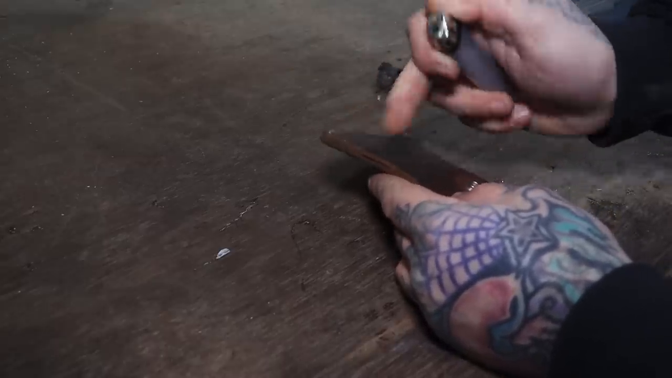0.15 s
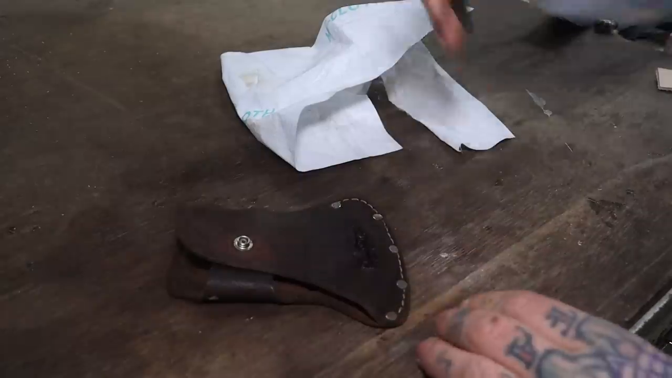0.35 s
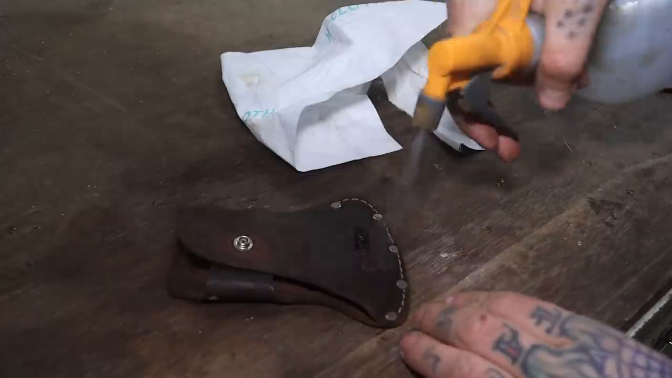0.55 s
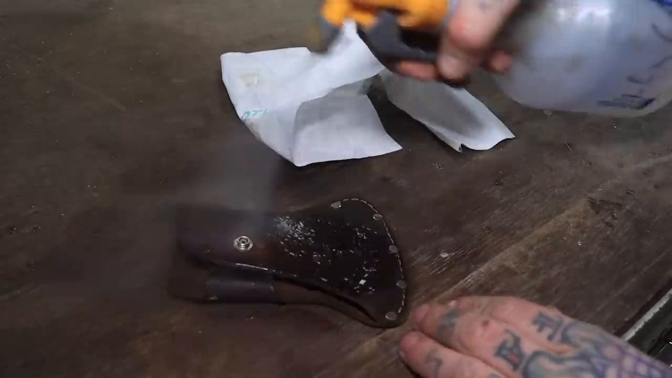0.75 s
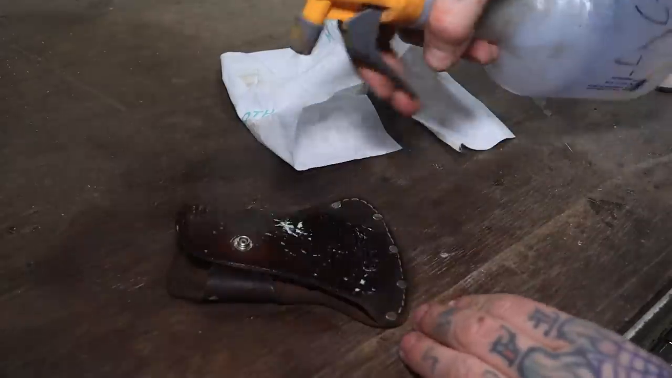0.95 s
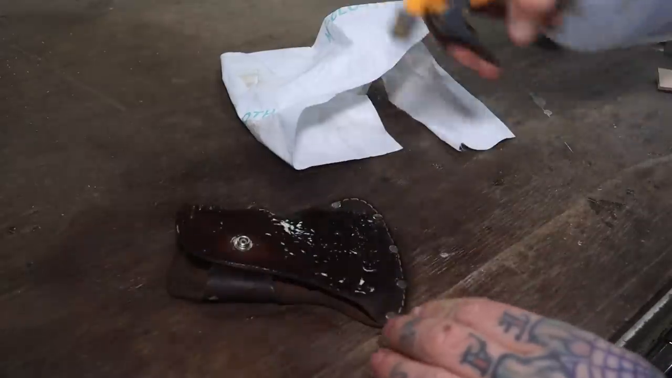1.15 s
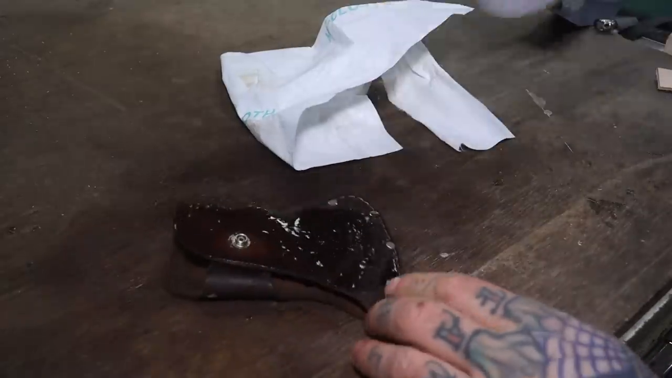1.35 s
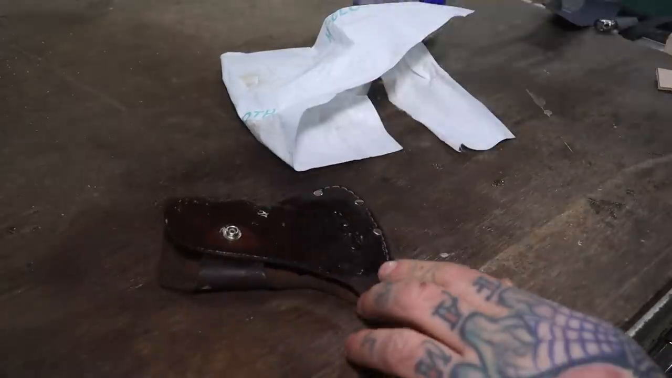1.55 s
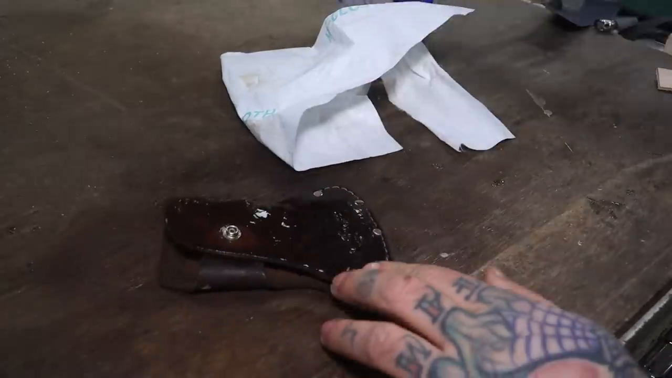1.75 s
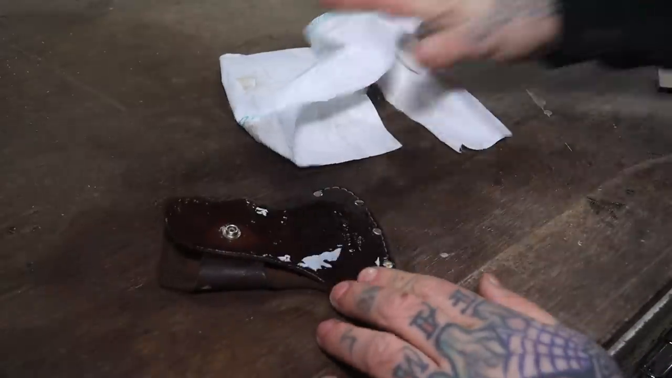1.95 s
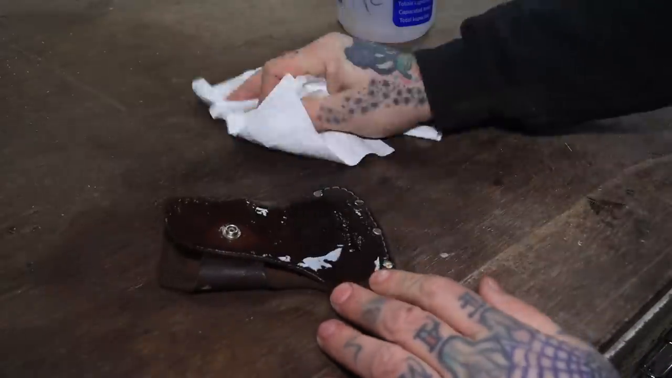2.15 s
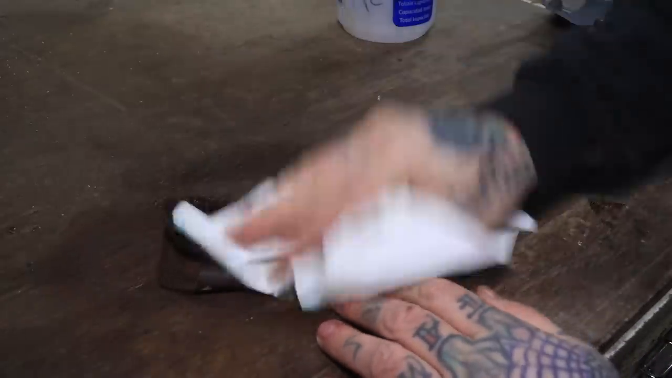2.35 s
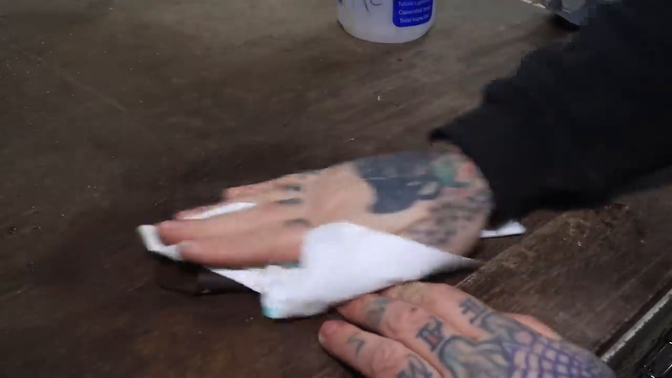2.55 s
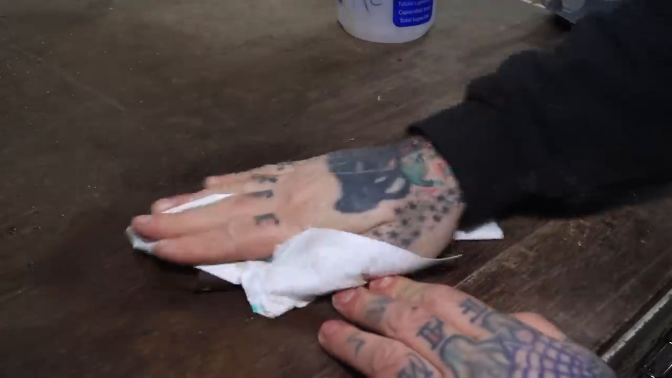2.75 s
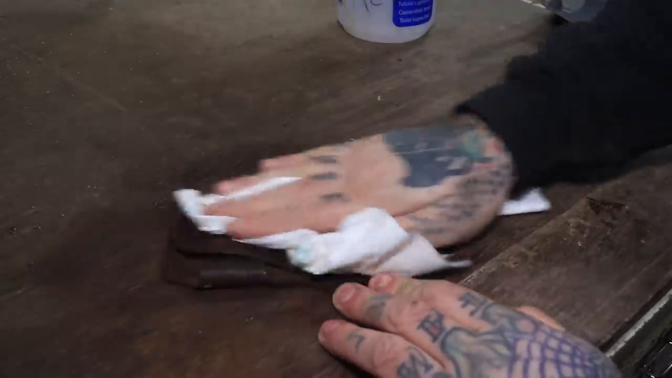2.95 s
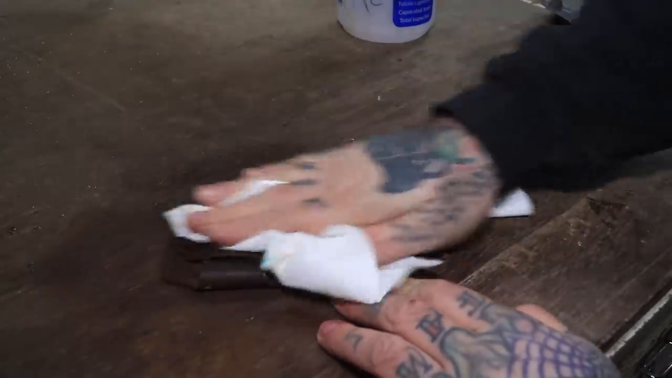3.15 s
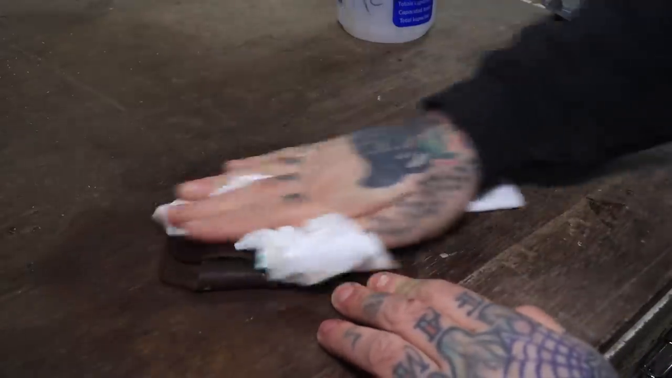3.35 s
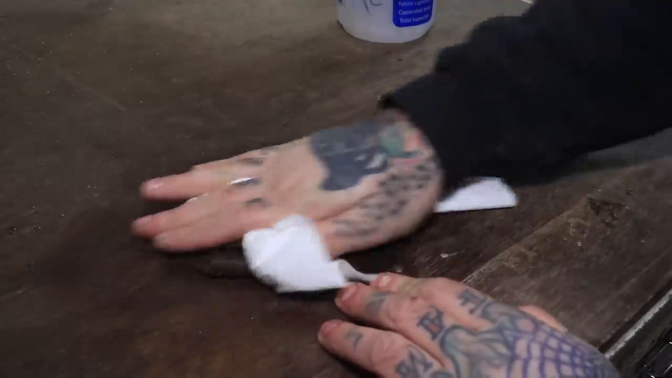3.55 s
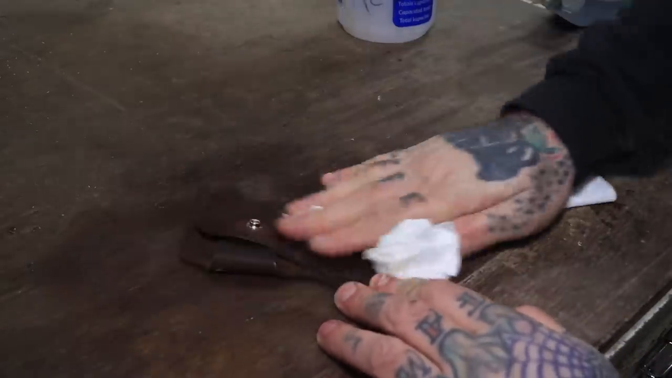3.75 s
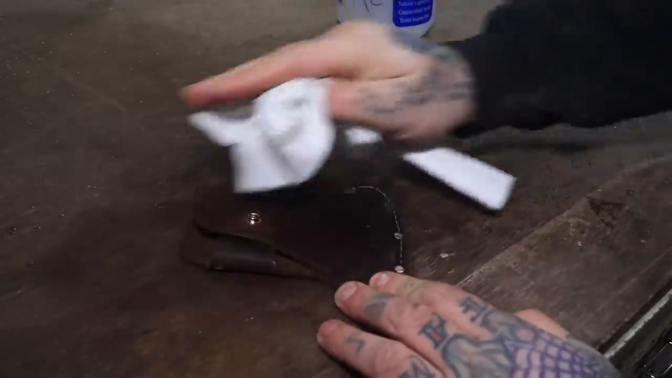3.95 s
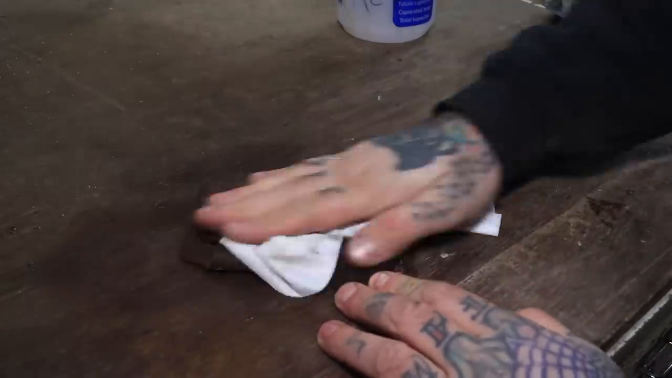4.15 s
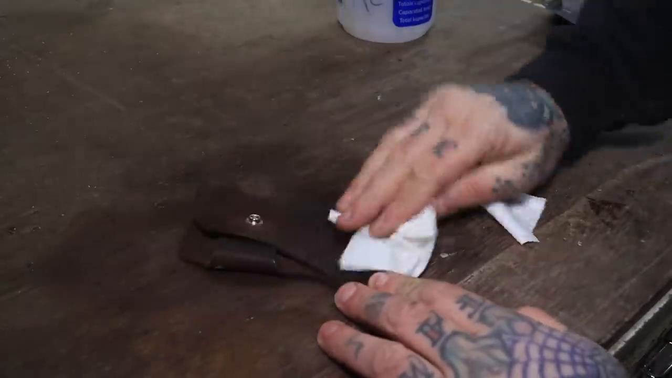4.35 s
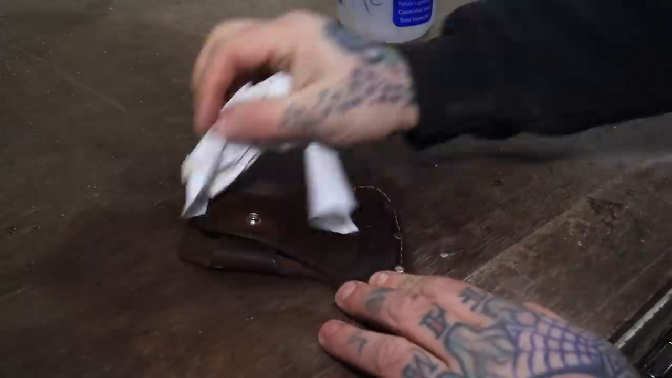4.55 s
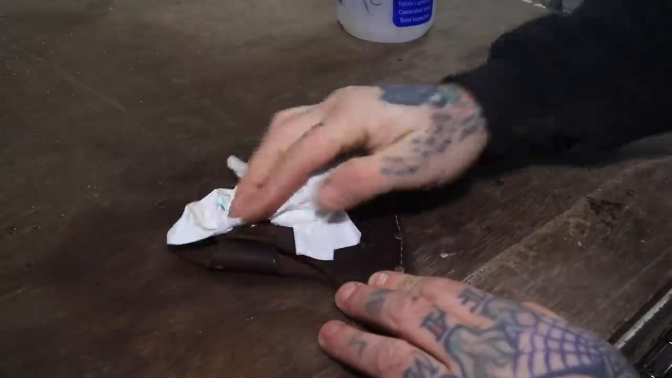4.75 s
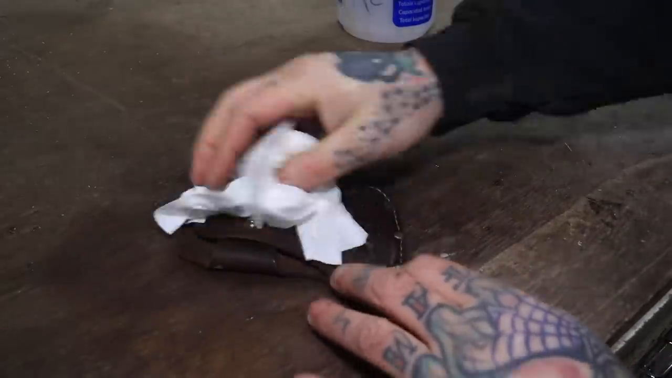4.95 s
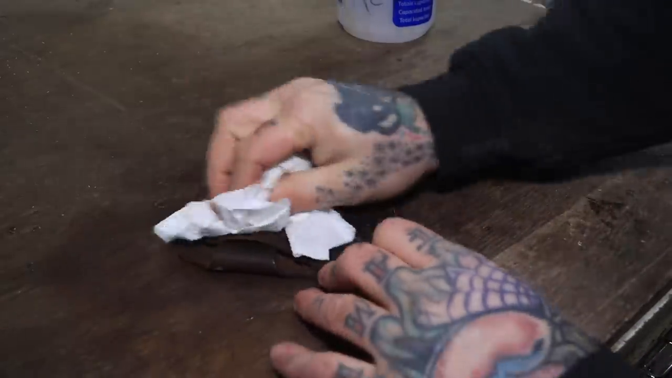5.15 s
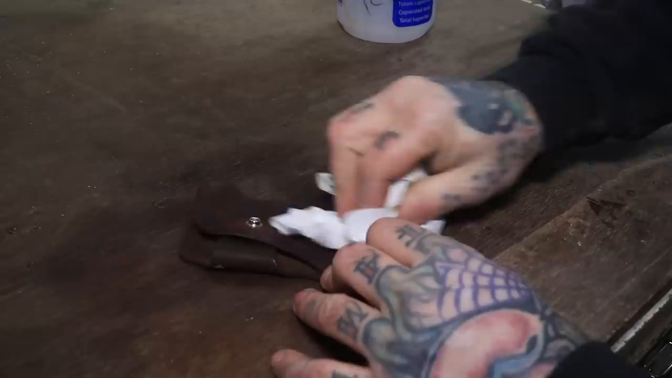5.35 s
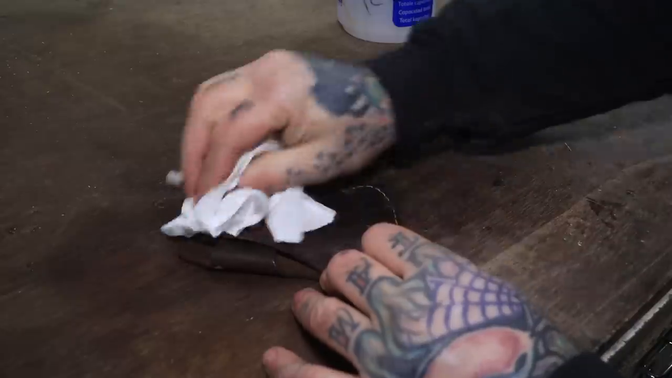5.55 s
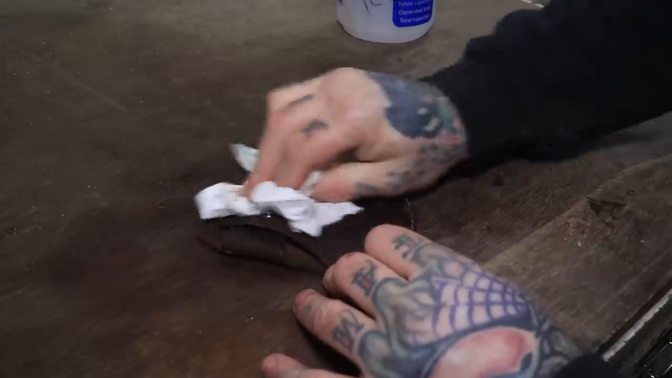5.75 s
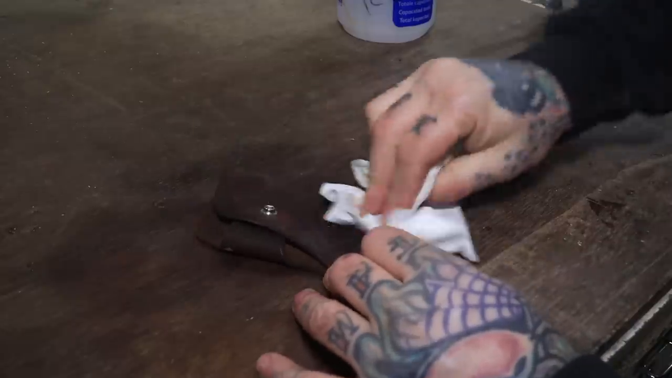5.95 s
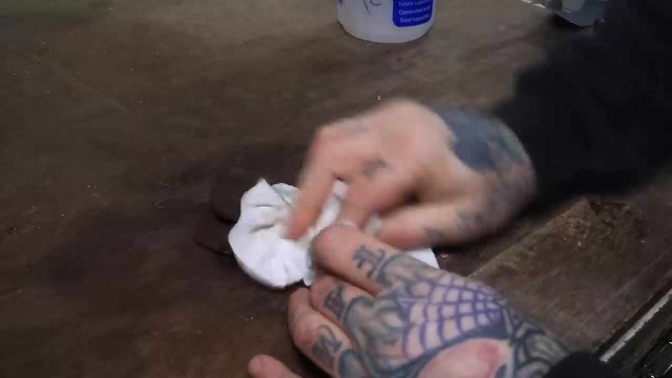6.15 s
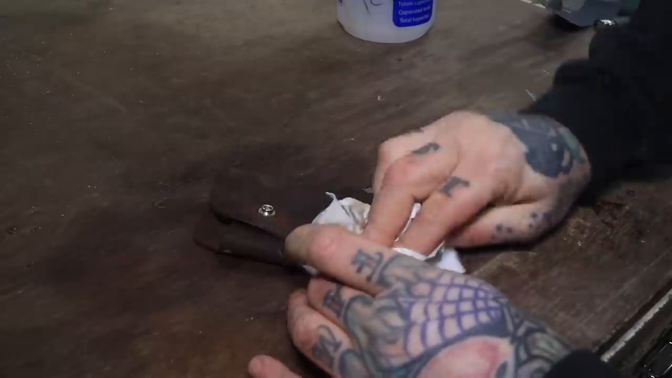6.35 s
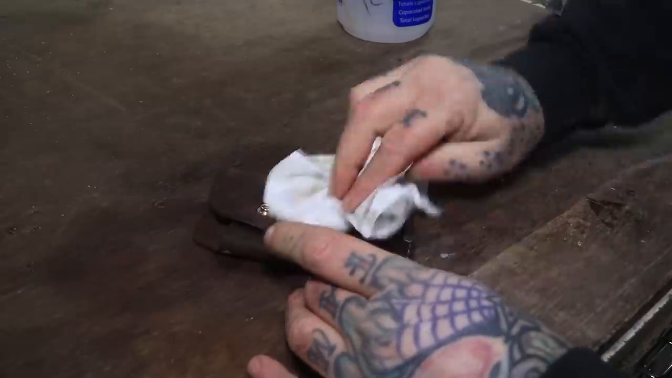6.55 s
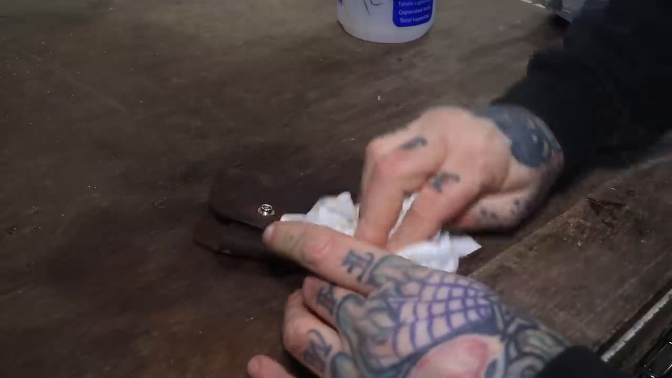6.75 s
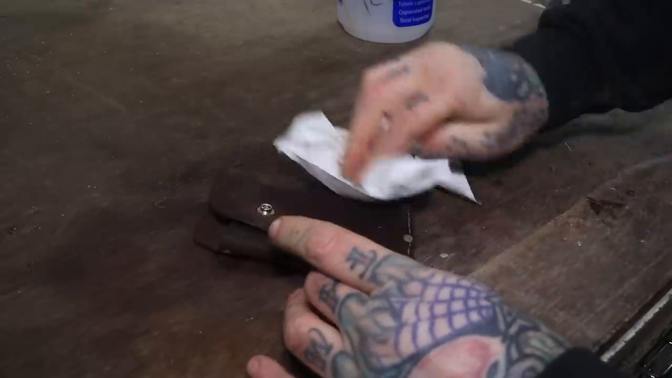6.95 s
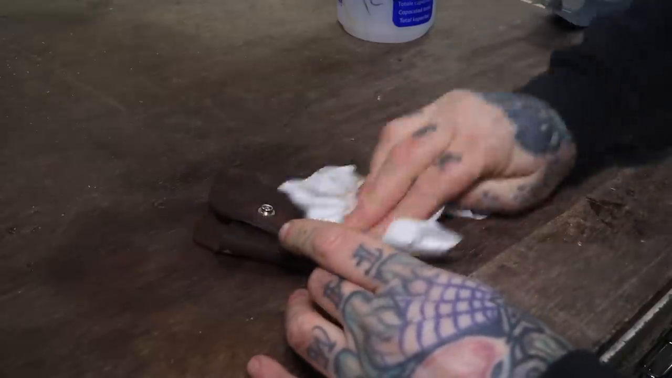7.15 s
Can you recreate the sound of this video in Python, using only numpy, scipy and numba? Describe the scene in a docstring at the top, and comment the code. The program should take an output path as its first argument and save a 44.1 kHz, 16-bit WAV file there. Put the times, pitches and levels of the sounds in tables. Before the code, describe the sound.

Two squeaky pumps of a spray bottle hiss over leather, the bottle bangs down on a wooden bench, then a towel scuffs and wipes busily.

```python
"""A small workshop hums faintly throughout, as filtered noise. Sleeve and fingers brush the leather: random slips.
A spray bottle's hollow body thuds as it is handled (gliding sines), amid ticks. A hand pumps it twice over a
leather sheath: mist hisses, the pump squeaks and creaks, liquid gulps. It is set down hard on a wooden bench,
whose modes ring while loose things rattle as filtered knocks; the close microphone clips this loudest knock.
Last, a crumpled towel wipes the leather: slips drag, filtered bursts crackle, the palm thumps the bench."""
import sys
import numpy as np
from scipy import signal
from scipy.fft import rfft, irfft
from scipy.io import wavfile
from scipy.ndimage import uniform_filter1d
from numba import njit

SR = 44100
rng = np.random.default_rng(int(sys.argv[2]) if len(sys.argv) > 2 else 0)


def invert_db(level):
    """Linear amplitude ratio for a level in decibels (20 dB per decade), elementwise."""
    return 10 ** (np.asarray(level, dtype=float) / 20)


def output_pcm(signal):
    """Save a mono or channel-first signal as 16-bit PCM at the path in sys.argv[1].

    Samples are clipped to [-1, 1] before scaling.
    """
    pcm = np.clip(np.atleast_2d(signal).T, -1, 1) * 32767
    wavfile.write(sys.argv[1], SR, np.round(pcm).astype(np.int16))


N = 317079
T = np.arange(N) / SR  # time of each sample [s]

# spectrum of the workshop air noise: (frequency [Hz], relative level [dB])
SHOP_SPECTRUM = [(25, -13.5), (45, 2.5), (65, -20), (90, -9), (120, -5), (150, -1), (200, -11),
                 (260, -12.5), (400, -13.5), (700, -18.5), (1300, -27.5), (3500, -30), (6000, -39.5),
                 (16000, -42)]
SHOP_DB = -55.5
# wavering hum: (centre [Hz], width [Hz], level [dB])
HUM_BANDS = [(145, 4.9, -61.5), (199, 3.8, -66)]

# spectrum of cloth and skin dragging: (frequency [Hz], relative level [dB])
DRAG_SPECTRUM = [(200, -15.5), (500, -9.5), (800, -8), (1300, 4), (1700, -21), (2200, 5), (2800, 3.5),
                 (3450, 7), (4100, -2), (4800, 2.5), (6000, -4), (7500, -13), (10000, -19.5), (16000, -59)]
# spectrum of the leather body: (frequency [Hz], relative level [dB])
BODY_SPECTRUM = [(200, -14.5), (400, -10.5), (750, -7.5), (900, 1), (1000, -0.5), (1200, -3.5),
                 (1500, -5.5), (2000, -7.5), (3000, -17), (6000, -29)]
# spectrum of the fine fibre hiss: (frequency [Hz], relative level [dB])
FIBRE_SPECTRUM = [(3000, -25), (6000, -15), (8000, -11), (10000, -13.5), (13000, -12), (15200, -24),
                  (16500, -9)]
# cloth and skin dragging, one row per pull; sleeve and fingers before 1.6 s, then the towel:
# (start [s], length [s], drag level [dB], change over the pull [dB], pressure: body above drag [dB])
PULLS = [(.045, .035, -64, -3, -4), (0.227, 0.12, -64, 6.5, -3.5), (0.373, 0.038, -53.5, 9.5, -4.5),
         (0.434, 0.14, -55, -7.5, -0.5), (1.203, 0.091, -45.5, -13.5, 3), (1.296, .27, -55.5, -0.5, 2.5),
         (1.967, 0.051, -75, 9, 11), (2.072, 0.13, -46.5, 2, -1.5), (2.228, .04, -45.5, 4.5, -0.5),
         (2.27, 0.12, -44.5, -12, -2), (2.384, .04, -61, 2, 0), (2.425, 0.018, -44, -4, -3),
         (2.477, 0.041, -46.5, -6, 4), (2.534, 0.068, -47.5, 8, -3), (2.614, 0.075, -41.5, -7.5, 3),
         (2.729, 0.086, -58.5, 2.5, 4.5), (2.822, 0.12, -46, 2.5, 1.5), (2.986, 0.11, -44.5, 5.5, 2),
         (3.165, 0.047, -48, 7, 1.5), (3.225, 0.072, -38, -4.5, 0), (3.351, 0.13, -44, 4, 0),
         (3.467, 0.063, -45, -0.5, 4), (3.591, 0.1, -39.5, -2, 3.5), (3.7, 0.18, -42, -6, -1),
         (3.878, 0.11, -50.5, -4.5, -1), (4.03, .05, -66, 4, 2.5), (4.107, 0.025, -44, -9, 5.5),
         (4.148, .16, -42, 3, 1.5), (4.309, .18, -42, -15, -1.5), (4.511, 0.17, -58.5, 1.5, -1),
         (4.71, 0.15, -51.5, -7, -1), (4.887, 0.106, -53.5, 1.5, -3), (4.995, 0.2, -51.5, -3.5, -1.5),
         (5.216, 0.23, -45.5, 1.5, -2.5), (5.494, 0.054, -47.5, -7, -6), (5.57, .08, -52, -2, -1),
         (5.723, 0.098, -41.5, -3.5, 1.5), (5.822, .19, -42, -2.5, -1.5), (6.008, 0.08, -49, -9, 1.5),
         (6.1, 0.1, -65, 6.5, 3.5), (6.209, 0.17, -47.5, 3, -0.5), (6.412, 0.13, -46.5, 5.5, -2.5),
         (6.545, 0.086, -45, -11.5, -3.5), (6.672, 0.034, -53.5, 1, 4.5), (6.795, 0.13, -44.5, 3, -2.5),
         (6.928, 0.081, -48, -1.5, -0.5), (7.042, 0.055, -59.5, -3, 1.5), (7.141, 0.011, -45, -13, 9),
         (7.187, .03, -47.5, -7, 10)]
PULL_RISE_DB_S, PULL_FALL_DB_S = 698, 558
# the palm bears down and the leather groans: (start [s], length [s], level [dB], change [dB])
PRESSES = [(2.246, 0.017, -47, -4), (2.42, 0.02, -37.5, 3.5), (2.882, 0.021, -35.5, -5),
           (3.076, 0.032, -35.5, -3), (3.21, 0.021, -37, -4), (3.447, 0.02, -39, -10),
           (3.588, .025, -36, -5), (4.098, 0.011, -38, -2), (4.235, .02, -38, -5), (4.29, 0.017, -50, -5),
           (5.295, 0.039, -45.5, -6), (6.201, 0.013, -42.5, -2.5)]
PRESS_RISE_DB_S, PRESS_FALL_DB_S = 2500, 404
# fibre level under a -45 dB pull without pressure, growth per dB of drag, dulling per dB of pressure
FIBRE_DB, FIBRE_GROWTH, FIBRE_DULLING = -54, 1, 0.46
FIBRE_LAG_S, FIBRE_FALL_DB_S = 0.017, 900  # the hiss lags behind the contact

# plastic ticks and towel creases snapping:
# (time [s], ring peak [dB], ring [Hz], crack above ring [dB], treble edge above ring [dB])
TICKS = [(.375, -32.5, 1500, -7, -3), (.397, -37, 4570, -8, -19), (.403, -29.5, 2720, 3, -35),
         (.411, -30.5, 1870, -9, -20), (.447, -37, 1920, 8, -5), (.466, -37, 5500, 0, -2),
         (.479, -41, 1500, -3, -15), (.535, -28.5, 3520, -12, -11), (.573, -32, 3500, -4, -10),
         (.577, -36, 1200, -9, 6.5), (.608, -31.5, 2280, -3, -8), (.82, -29, 4800, -5, -3),
         (.848, -31, 3410, -11, -8), (.868, -35, 1050, -7, -11), (.91, -30, 3400, -9, -23),
         (.992, -44, 2370, -9, 0), (1.005, -31, 1830, -7, -13), (1.142, -31, 2060, -7, -15),
         (1.204, -12, 1840, -28, -43), (1.28, -38.5, 1130, 0, 14), (1.324, -40, 1650, 8, -25),
         (1.335, -33, 2570, -12, -20), (1.477, -33, 1850, -21, -26), (1.514, -43, 5000, -6, -21),
         (1.568, -44, 5500, -9, -21), (1.604, -4.5, 760, -4, -25), (1.635, -33, 5000, 2, -2),
         (1.658, -40, 6500, 2, 0), (1.755, -27.5, 2200, -6, -24), (1.78, -30, 802, -17, -32),
         (1.868, -49, 5300, -8, -15), (1.892, -40, 880, 2.5, -22), (2.429, -18.5, 800, -2.5, -33),
         (2.604, -29, 1580, -11, -23), (2.829, -40, 900, 7, -23), (3.082, -19, 1000, -16, -28),
         (3.211, -27, 960, -20, -26), (3.444, -17.5, 1140, -6, -28), (3.606, -24.5, 950, -10, -24),
         (4.1, -24, 790, -7, -34), (4.106, -22, 900, -11, -24), (4.24, -24, 890, -20, -30),
         (4.3, -24, 1250, -19, -31), (4.431, -35, 880, -2, -25), (4.709, -39, 1090, 1, -17),
         (5.211, -39, 2280, -7, -20), (5.71, -32, 1250, -4, -25), (5.775, -33.5, 4500, -4, -20),
         (5.866, -29.5, 890, 7.5, -23), (5.974, -21, 2760, 5.5, -11), (5.984, -28, 2490, 1, -24),
         (6.205, -27, 1140, -15, -22), (6.259, -33, 1190, -7, -21), (6.62, -43, 2500, 0, -22),
         (6.668, -37.5, 890, 1, -27), (6.799, -45, 3400, -11, -25), (6.917, -30, 2310, -7, -10),
         (6.93, -19, 2790, 7.5, -37), (6.933, -24, 2360, -10, -24), (6.945, -34, 910, 9, -25),
         (7.007, -30, 3730, -9, -29), (7.135, -21.5, 810, 5.5, 1), (7.176, -30.5, 894, 7, -22)]
TICK_T60_S = 0.016
RING_SPREAD_HZ = 340  # half width of a tick's ring

# the bottle's hollow body thudding near 350 Hz when handled (first two rows), then liquid gulping
# during the sprays: (start [s], length [s], level [dB], first pitch [Hz], last pitch [Hz])
THUDS_AND_GULPS = [(0.384, 0.042, -47, 310, 350), (0.578, 0.052, -49.5, 310, 360),
                   (1.012, 0.031, -32.5, 347, 362), (1.078, 0.084, -43, 167, 364)]
# spectrum of the mist: (frequency [Hz], relative level [dB])
MIST_SPECTRUM = [(300, -29), (700, -1), (1500, -2.5), (3000, -5), (5000, -5.5), (7000, -6), (8300, -2),
                 (10000, -8), (12000, -4), (15500, -10), (17000, -38)]
# resonances of the plastic trigger head: (centre [Hz], width [Hz], relative level [dB])
TRIGGER_MODES = [(1840, 75, 4), (2020, 180, 2), (2310, 136, 6.5), (2640, 270, -31)]
# resonances of the valve drawing air: (centre [Hz], width [Hz], relative level [dB])
INTAKE_MODES = [(3534, 260, 3), (4630, 1700, 0)]
# jet from the nozzle: (start [s], length [s], level [dB], change [dB])
JETS = [(.602, 0.063, -39, 4), (.66, 0.15, -48.5, 8), (.81, 0.044, -37.5, 2.5), (.875, 0.016, -35, 0.5),
        (.92, 0.033, -55, 4), (.993, 0.029, -38, 3.5), (1.04, 0.12, -44, -2), (1.15, 0.021, -44.5, 5)]
# piston squeaks: (start [s], length [s], level [dB], change [dB])
SQUEAKS = [(.642, 0.057, -37, 2), (.705, 0.037, -37, 3), (.755, .045, -44.5, -6), (.866, 0.041, -38.5, -2),
           (1.003, 0.037, -38, 1), (1.055, 0.043, -46, -8), (1.14, 0.033, -49, -1)]
# pitch of the squeaks over time: (time [s], pitch [Hz])
SQUEAK_PITCH = [(.6, 730), (.65, 740), (.73, 827), (.86, 960), (.92, 920), (1., 880), (1.04, 940),
                (1.1, 884)]
# trigger creaks: (start [s], length [s], level [dB], change [dB])
CREAKS = [(.625, .035, -40, -3), (.668, 0.038, -33.5, 1.5), (.712, 0.033, -28, -3.5),
          (.867, 0.012, -29.5, -3), (1.003, 0.045, -35.5, 3), (1.065, .02, -43, 2),
          (1.141, 0.018, -32.5, -4)]
# valve drawing air: (start [s], length [s], level [dB], change [dB])
DRAWS = [(.63, 0.044, -36, 2), (.7, 0.199, -41, -3.5), (.932, 0.037, -38.5, -3), (1., 0.028, -38.5, 4),
         (1.04, 0.091, -45, 7), (1.145, 0.029, -41.5, 5)]
PUMP_RISE_DB_S, PUMP_FALL_DB_S = 3000, 1600
WHISTLE_HZ, WHISTLE_OCTAVES_PER_S = 2500, 23  # pitch at the whistle's start, then its climb
WHISTLE_S, WHISTLE_LENGTH_S = .63, .065
WHISTLE_DB, WHISTLE_SWELL_DB = -49, 4

# bottle and palm striking the bench:
# (time [s], peak [dB], contact [ms], extra level of the two deepest modes [dB])
BLOWS = [(.385, -38, 1.3, -11), (.41, -39.5, 1.5, -17), (0.577, -43, 2.7, -23), (0.612, -45, 1.2, -18),
         (1.6043, 4, 0.22, -34), (1.6061, -6.5, 1.5, -28), (1.63, -8, 1.2, -16), (1.745, -20, 2.9, -10),
         (1.785, -13, 2.2, -11), (2.124, -29, 5.2, -11), (2.432, -20, 4.5, 0.5), (2.876, -31.5, 5.9, -0.5),
         (3.061, -34.5, 4.9, 0), (3.386, -30, 4.2, 2.5), (4.107, -19, 9.8, -2), (4.193, -25.5, 2.6, -5),
         (4.24, -31, 1.3, -12), (4.72, -39, 14, -13), (5.221, -33.5, 4.9, -3.5), (5.812, -31.5, 3.6, -1),
         (6.204, -26.5, 2.3, 0), (7.133, -15.5, 4.4, -10), (7.176, -30, 1.9, -6)]
# modes of the bench top: (frequency [Hz], relative level [dB], longest time to fall 60 dB [s])
BENCH_MODES = [(44, -6.5, 0.79), (70.8, -1.5, 0.84), (105.9, -9, 0.42), (140.5, 3.5, 0.11),
               (201, 0.5, 0.059), (258, 2.5, 0.063), (332, 0, 0.056), (480, -12, 0.26), (560, -10, 0.14),
               (760, -18, .1), (960, -11, .08), (1250, -6, 0.059), (1520, 2.5, 0.063), (1820, 0, 0.021),
               (2100, 5, 0.075), (2360, 9.5, 0.089), (2520, -3, .025), (3130, 7.5, 0.054)]
WOOD_CYCLES = 40  # a bench mode falls 60 dB within this many cycles

# dull spectrum of the rattle: (frequency [Hz], relative level [dB])
CLATTER_SPECTRUM = [(35, -41), (60, -1), (85, 2), (119, 4), (280, -3), (433, -2.5), (521, -8.5),
                    (661, -8.5), (826, -7.5), (1060, -26), (1260, -22), (1400, -20), (1820, -49),
                    (3080, -120)]
# loose things rattling on the shaken bench:
# (start [s], level [dB], time to fall 60 dB at fade speed 1 [s])
RATTLES = [(1.608, -9.5, 0.22), (1.63, -17.5, 0.43), (1.751, -22, 0.34), (1.78, -26.5, 0.49),
           (1.91, -41, 0.22)]
RATTLE_RISE_DB_S = 605
RATTLE_EDGE_DB = -16  # bright edge against the dull part
CLATTER_FADE, RATTLE_EDGE_FADE = 0.91, 1.2  # fade speeds of the dull part and the bright edge

ROOM_T60_S, ROOM_DB = 0.23, -20.5


def level(x, db):
    """Scale to an rms level, steady or moving."""
    return x * invert_db(db) / np.sqrt(np.mean(x ** 2))


def colour(x, points):
    """Shape the spectrum by (Hz, dB) points with a causal, minimum-phase response."""
    hz, db = np.transpose(points)
    f = np.maximum(np.fft.rfftfreq(4096, 1 / SR), 1)
    log_gain = np.interp(np.log(f), np.log(hz), db) * np.log(10) / 20
    cepstrum = irfft(log_gain)
    cepstrum[1:2048] *= 2  # folding the second half onto the first makes it causal
    response = irfft(np.exp(rfft(cepstrum[:2049], 4096)))
    return signal.fftconvolve(x, response)[:N]


@njit
def ring(x, hz, width):
    """One resonance: a decaying spin driven by x; its centre may move every sample."""
    y, z = np.empty(len(x)), 0j
    for i in range(len(x)):
        z = z * np.exp(complex(-np.pi * width, 2 * np.pi * hz[i]) / SR) + x[i]
        y[i] = z.imag
    return y


def bank(x, modes):
    """Fixed resonances side by side, each at its own level."""
    return sum(level(ring(x, np.full(N, 1. * hz), 1. * width), db) for hz, width, db in modes)


def walk(rate):
    """Random wander in straight lines between normal draws, rate new draws a second."""
    hold = max(int(SR / rate), 1)
    steps = np.repeat(rng.standard_normal(N // hold + 1), hold)
    return uniform_filter1d(steps, hold)[:N]


def grains(rate, scatter_db):
    """Tiny slips at random moments, about rate a second, a few much larger than the rest."""
    moment, sign, size = rng.random((3, N))
    size = np.minimum(-np.log(1 - size), 5)
    return (moment < rate / SR) * np.sign(sign - .5) * invert_db(scatter_db * size)


def die_away(t, t60):
    """Exponential decay that falls 60 dB in t60 seconds."""
    return np.exp(-np.log(1000) * t / t60)


def contour(rows, rise_db_s, fall_db_s):
    """Level in dB of events that rise, drift over their length and fall; overlaps add in power."""
    t, power = T[::32], 1e-12
    for start, length, db, change_db in rows:
        length = max(length, .002)
        drift = change_db * np.clip((t - start) / length, 0, 1)
        rise = rise_db_s * np.maximum(start - t, 0)
        fall = fall_db_s * np.maximum(t - start - length, 0)
        power = power + invert_db(2 * (db + drift - rise - fall))
    return np.interp(T, t, 10 * np.log10(power))


def shop():
    """Soft air noise, and a hum made by noise in narrow resonances so that it wavers."""
    air = level(colour(rng.standard_normal(N), SHOP_SPECTRUM), SHOP_DB)
    return air + bank(rng.standard_normal(N), HUM_BANDS)


def wipe():
    """Fibres slip by the thousand; harder pressure sounds the leather body."""
    # every slip is heard in all three ranges, each time with its own polarity
    slips = grains(6000, 3.4) * np.sign(rng.standard_normal((3, N)))
    slips = slips + 0.94 * rng.standard_normal((3, N))
    drag = colour(slips[0] + grains(60, 6.45), DRAG_SPECTRUM) * invert_db(2.0 * walk(60))
    body = colour(slips[1] + grains(990, 1.4), BODY_SPECTRUM) * invert_db(3.0 * walk(49))
    fibre = colour(slips[2], FIBRE_SPECTRUM) * invert_db(2.3 * walk(80))

    pressed, fine = [], []
    for start, length, db, change, pressure in PULLS:
        pressed.append((start, length, db + pressure, change))
        fine_db = FIBRE_DB + FIBRE_GROWTH * (db + 45) - FIBRE_DULLING * pressure
        fine.append((start, length, fine_db, FIBRE_GROWTH * change))
    drag_db = contour([row[:4] for row in PULLS], PULL_RISE_DB_S, PULL_FALL_DB_S)
    body_db = contour(pressed, PULL_RISE_DB_S, PULL_FALL_DB_S)
    press_db = contour(PRESSES, PRESS_RISE_DB_S, PRESS_FALL_DB_S)
    body_gain = np.hypot(invert_db(body_db), invert_db(press_db))

    fibre_db = contour(fine, PULL_RISE_DB_S, FIBRE_FALL_DB_S)
    a = 1 / (max(FIBRE_LAG_S, 1e-3) * SR)
    # smoothed dB above a -85 dB floor; the lower of the two delays only the rises
    lagging_db = signal.lfilter([a], [1, a - 1], np.maximum(fibre_db + 85, 0)) - 85
    fibre_db = np.minimum(fibre_db, lagging_db)
    return level(drag, drag_db) + level(body, 0) * body_gain + level(fibre, fibre_db)


def ticks():
    """A snap and its crumbs, heard as a short ring, a broad crack and a thin treble edge."""
    out, t = np.zeros(N + 2048), np.arange(2048) / SR
    noise = rng.standard_normal((len(TICKS), 2048))
    wide = signal.butter(2, [1300, 6000], "band", fs=SR, output="sos")
    treble = signal.butter(2, 6000, "high", fs=SR, output="sos")
    for (start, db, hz, crack_db, edge_db), crumbs in zip(TICKS, noise):
        burst = crumbs * die_away(t, TICK_T60_S)
        burst[:8] += 3.06 * np.hanning(8)  # the snap itself
        band = [hz - RING_SPREAD_HZ, hz + RING_SPREAD_HZ]
        near = signal.butter(2, band, "band", fs=SR, output="sos")
        tone = signal.sosfilt(near, burst)
        crack = signal.sosfilt(wide, burst)
        edge = signal.sosfilt(treble, burst * np.exp(-t / 0.0033))
        i = int(start * SR)
        for part, gain_db in ((tone, 0), (crack, crack_db), (edge, edge_db)):
            out[i:i + 2048] += invert_db(db + gain_db) * part / np.abs(part).max()
    return out[:N]


def pump_contour(rows):
    """Level in dB of spray bottle events, which start and stop abruptly."""
    return contour(rows, PUMP_RISE_DB_S, PUMP_FALL_DB_S)


def thuds_and_gulps():
    """The hollow bottle thuds, later its liquid gulps: rising sine tones, wavering in pitch and level."""
    waver, flicker_db, out = 1 + 0.099 * walk(90), 2.2 * walk(70.3), 0
    for start, length, db, first_hz, last_hz in THUDS_AND_GULPS:
        hz = np.interp(T, [start, start + length], [first_hz, last_hz]) * waver
        tone = np.sin(2 * np.pi * np.cumsum(hz) / SR)
        out = out + tone * invert_db(pump_contour([(start, length, db, 0)]) + flicker_db)
    return out


def piston_and_trigger():
    """Stick-slip grains squeak in a resonance of moving pitch and creak in the plastic head."""
    squeak_hz = np.interp(T, *np.transpose(SQUEAK_PITCH))
    slips = np.diff(grains(3000, 1.6) * invert_db(4.9 * walk(89.94)), prepend=0)
    piston = ring(ring(slips, squeak_hz, 106.0), squeak_hz, 106.0)
    trigger = bank(slips, TRIGGER_MODES)
    return level(piston, pump_contour(SQUEAKS)) + level(trigger, pump_contour(CREAKS))


def whistle():
    """The nozzle whistles: noise through one narrow resonance that climbs in pitch."""
    hz = WHISTLE_HZ * 2 ** (WHISTLE_OCTAVES_PER_S * np.clip(T - WHISTLE_S, -.02, .08))
    db = pump_contour([(WHISTLE_S, WHISTLE_LENGTH_S, WHISTLE_DB, WHISTLE_SWELL_DB)])
    return level(ring(rng.standard_normal(N), hz, 250.), db)


def sprayer():
    """The bottle thuds and gulps, mist hisses as droplets and noise, the valve draws air as noise."""
    mist = colour(grains(5000, 6.56) + 1.46 * rng.standard_normal(N), MIST_SPECTRUM)
    air = bank(rng.standard_normal(N) * invert_db(2.2 * walk(50.33)), INTAKE_MODES)
    spray = level(mist, pump_contour(JETS)) + whistle()
    intake = level(air, pump_contour(DRAWS))
    return thuds_and_gulps() + spray + piston_and_trigger() + intake


def bench():
    """Each blow is a smooth push into the same modes; a short contact reaches the high ones."""
    out, t = np.zeros(N + SR), np.arange(SR) / SR
    place_db = 1.5 * rng.standard_normal((len(BLOWS), len(BENCH_MODES)))  # varies from blow to blow
    for (start, db, contact_ms, sway_db), place in zip(BLOWS, place_db):
        modes = np.zeros(SR)
        for k, (hz, mode_db, t60) in enumerate(BENCH_MODES):
            # the two deepest modes rock the whole bench on its legs
            gain = invert_db(mode_db + place[k] + sway_db * (k < 2))
            modes += gain * np.sin(2 * np.pi * hz * t) * die_away(t, min(t60, WOOD_CYCLES / hz))
        push = np.hanning(int(np.clip(contact_ms, .1, 30) * SR / 1000) + 3)
        blow = signal.fftconvolve(modes, push)[:SR]
        i = int(start * SR)
        out[i:i + SR] += invert_db(db) * blow / np.abs(blow).max()
    return out[:N]


def rattle_fade(speed):
    """Level in dB of the loudest rattle at each moment: a rise to its jolt, then a fall."""
    curves = []
    for start, db, t60 in RATTLES:
        rise = RATTLE_RISE_DB_S * (start - T)
        fall = 60 * speed * (T - start) / t60
        curves.append(db - np.maximum(rise, fall))
    return np.max(curves, axis=0)


def rattle():
    """Irregular small knocks, dull with a thin bright edge, start at the first jolt and die away."""
    knocks = (grains(1000, 3.75) + 0.4 * rng.standard_normal(N)) * (T > RATTLES[0][0])
    dull = colour(knocks, CLATTER_SPECTRUM)
    edge = colour(knocks, [(700, -12.5), (1400, 6), (3500, -4.0), (4500, -12.5), (15000, -32)])
    edge_db = RATTLE_EDGE_DB + rattle_fade(RATTLE_EDGE_FADE)
    return level(dull, rattle_fade(CLATTER_FADE)) + level(edge, edge_db)


def room(x):
    """Adds the dull diffuse tail of a small workshop: decaying noise with the treble softened."""
    t = np.arange(SR // 2) / SR
    tail = rng.standard_normal(len(t)) * die_away(t, ROOM_T60_S) * (t > .004)
    tail = signal.sosfilt(signal.butter(1, 3000, fs=SR, output="sos"), tail)
    tail = tail / np.sqrt(np.sum(tail ** 2))
    return x + invert_db(ROOM_DB) * signal.fftconvolve(x, tail)[:N]


def scene():
    """Everything on the bench, in the room, over the workshop's own noise."""
    near = wipe() + ticks() + sprayer() + bench() + rattle()
    return (shop() + room(near))[None]


def top_cut(x):
    """Nothing passes above the cut-off."""
    return signal.sosfilt(signal.butter(12, 16510, fs=SR, output="sos"), x)


def record(dry):
    """The microphone drops the deepest bass, clips at full scale and loses the highest treble."""
    low_cut = signal.butter(6, 38, "high", fs=SR, output="sos")
    high_cut = signal.ellip(8, .2, 70, 15900, fs=SR, output="sos")
    clipped = np.clip(signal.sosfilt(low_cut, dry), -1, 1)
    mix = signal.sosfilt(high_cut, clipped)
    return top_cut(mix)


dry = scene()
out = record(dry)
output_pcm(out)
```